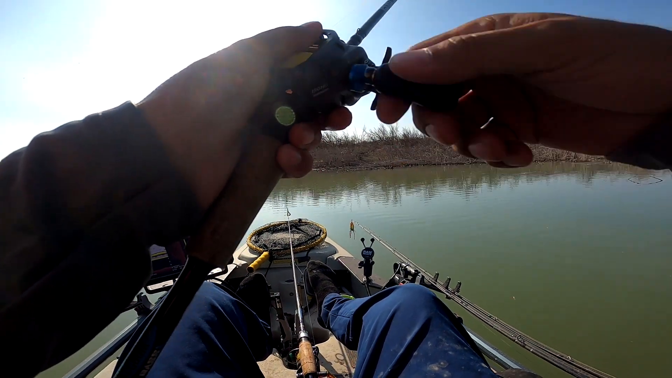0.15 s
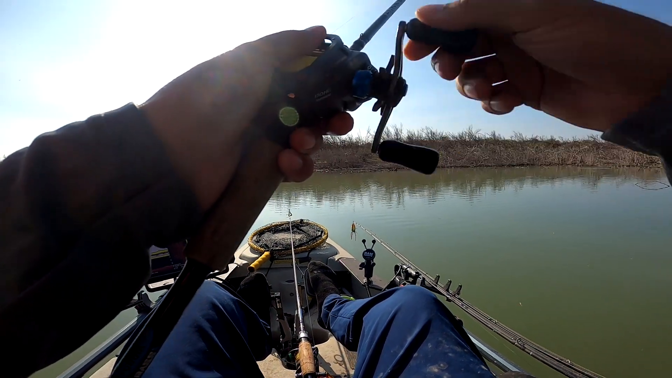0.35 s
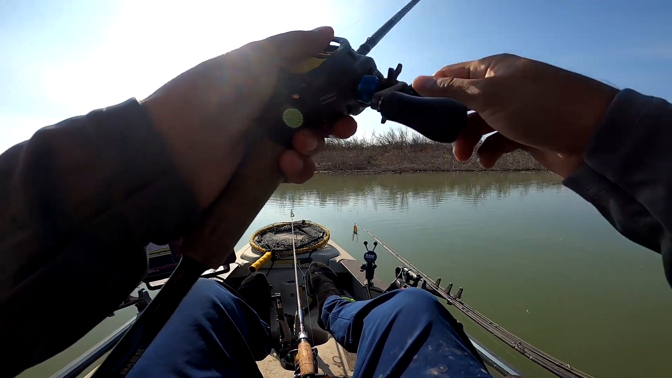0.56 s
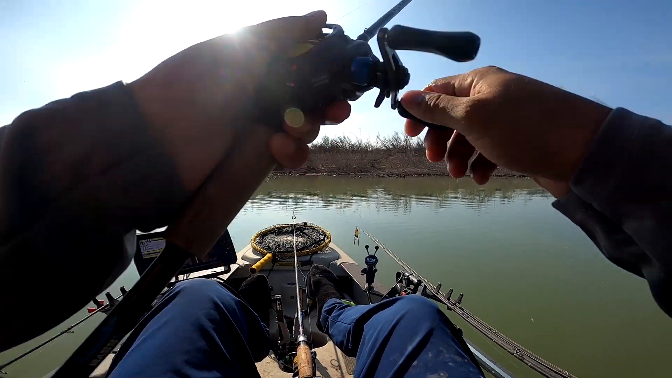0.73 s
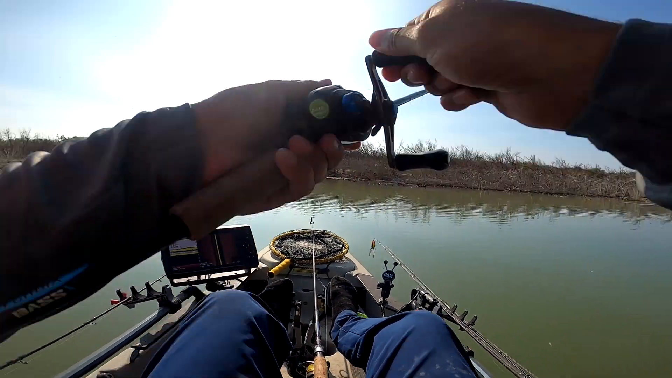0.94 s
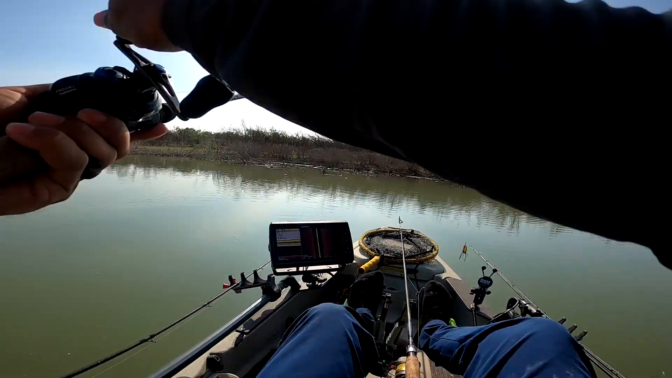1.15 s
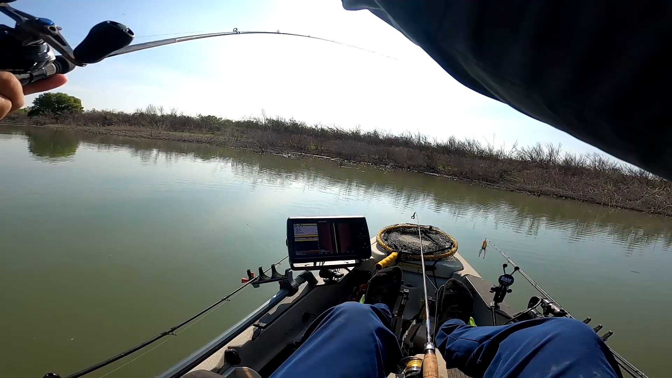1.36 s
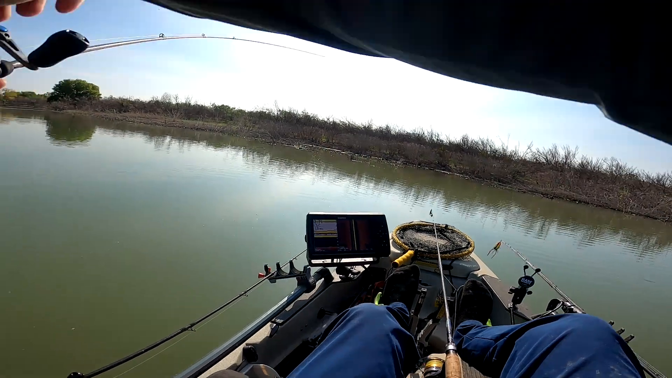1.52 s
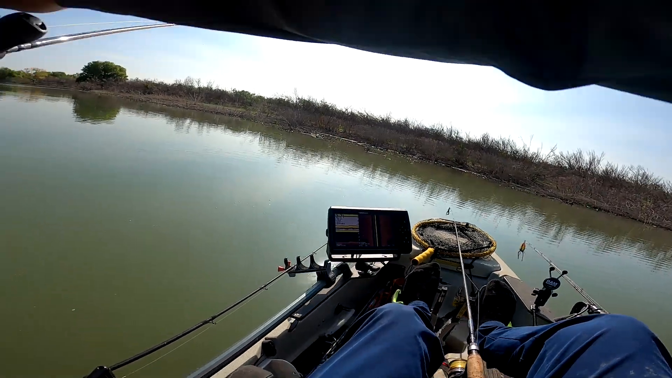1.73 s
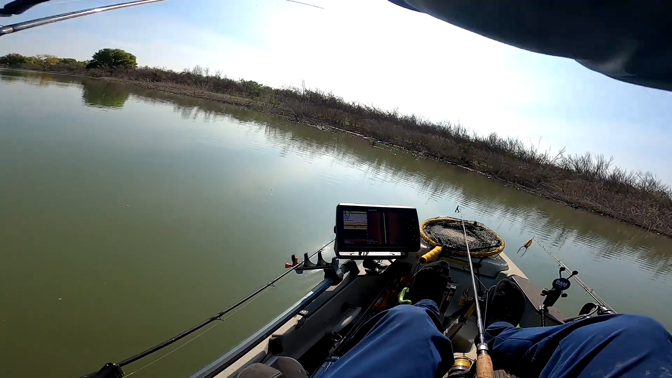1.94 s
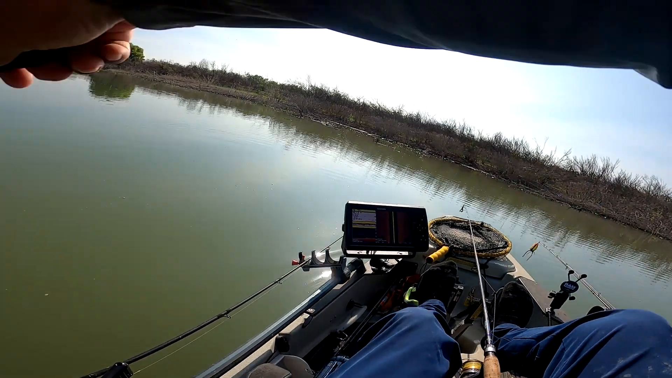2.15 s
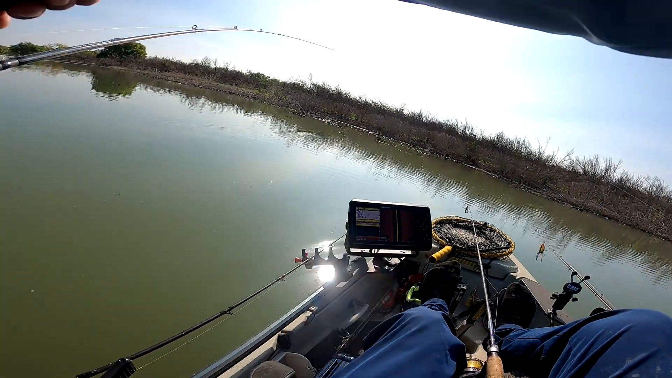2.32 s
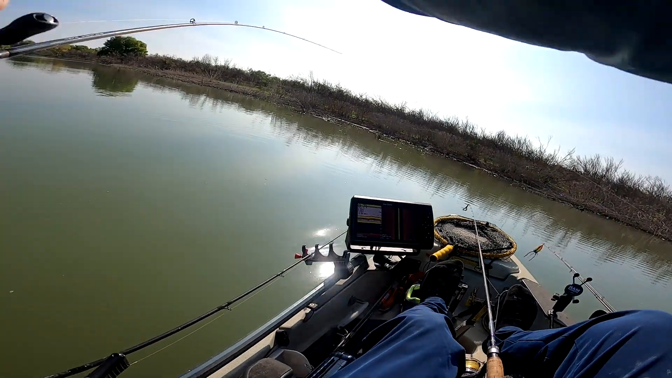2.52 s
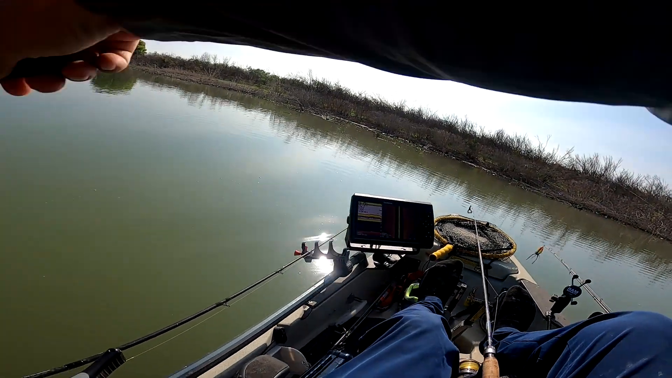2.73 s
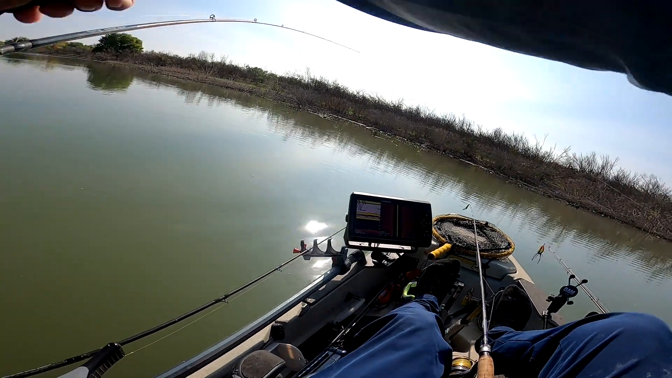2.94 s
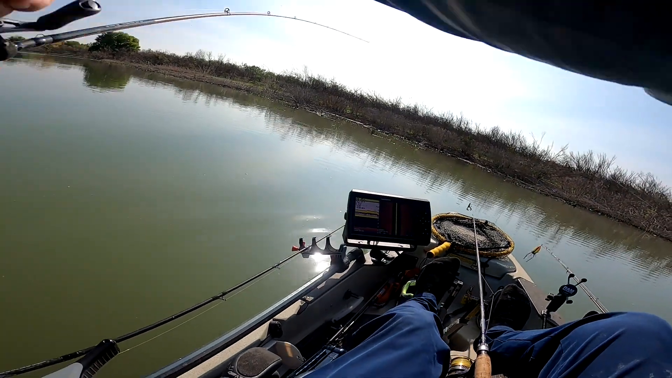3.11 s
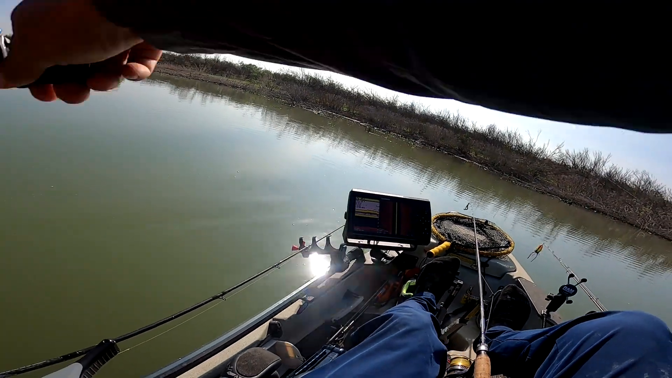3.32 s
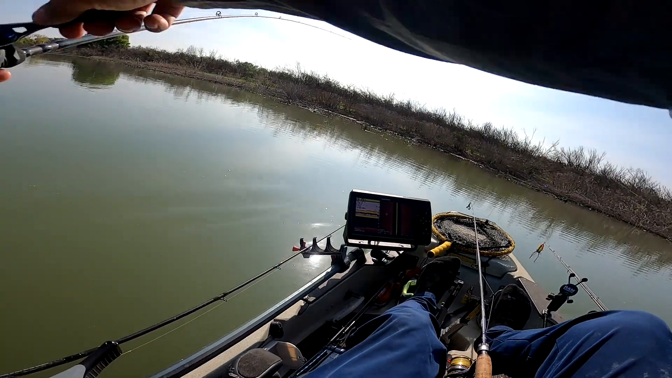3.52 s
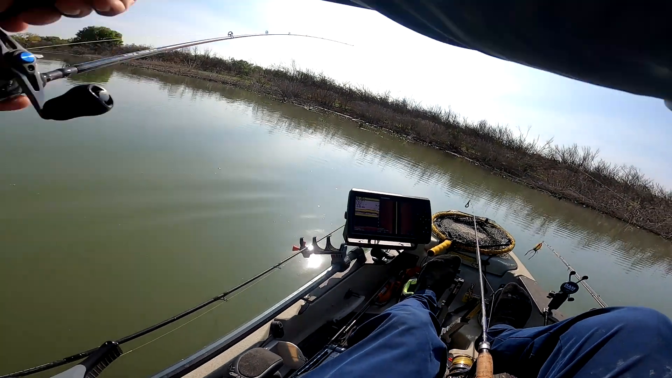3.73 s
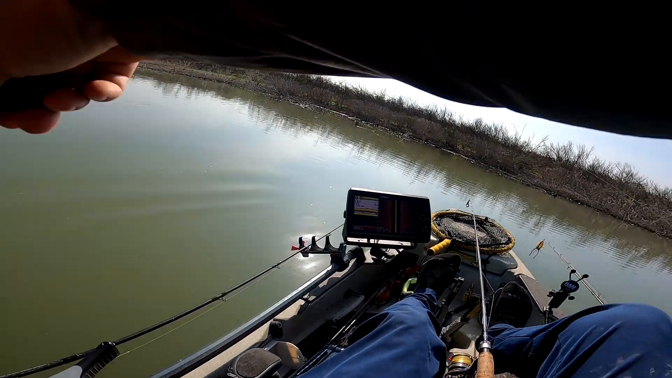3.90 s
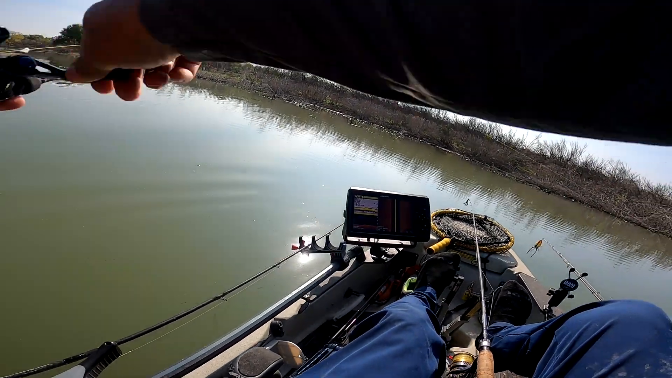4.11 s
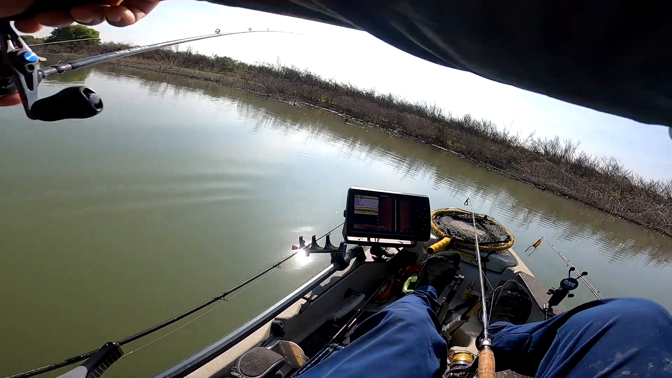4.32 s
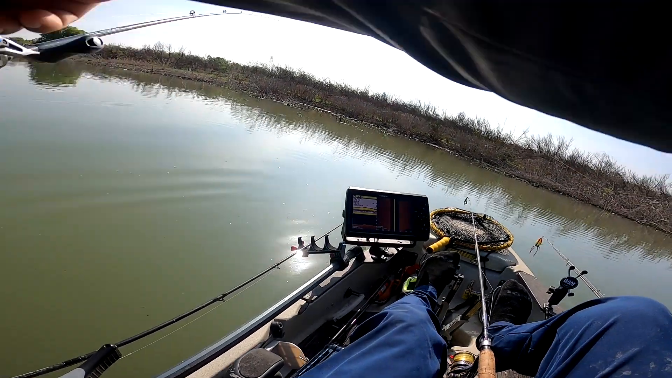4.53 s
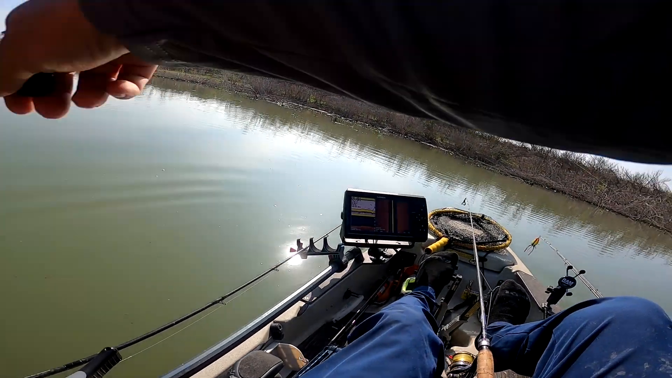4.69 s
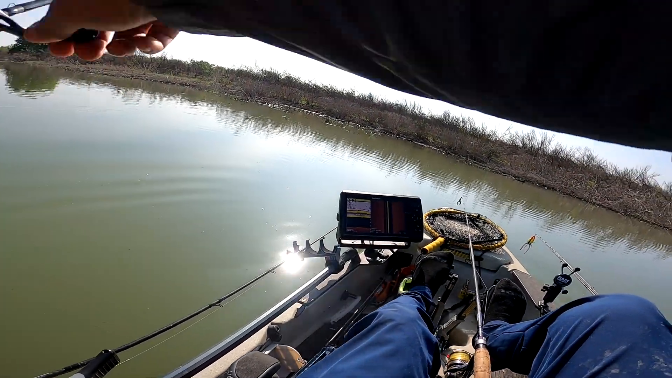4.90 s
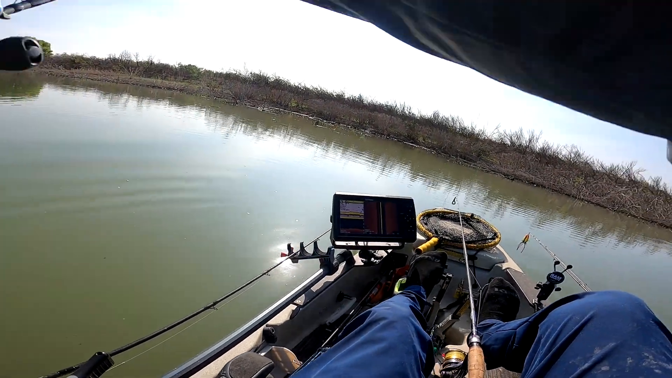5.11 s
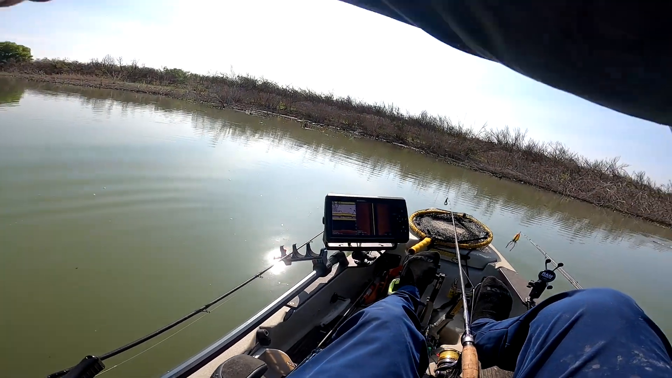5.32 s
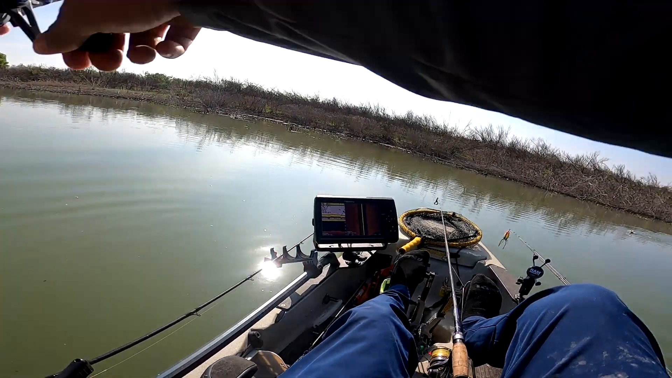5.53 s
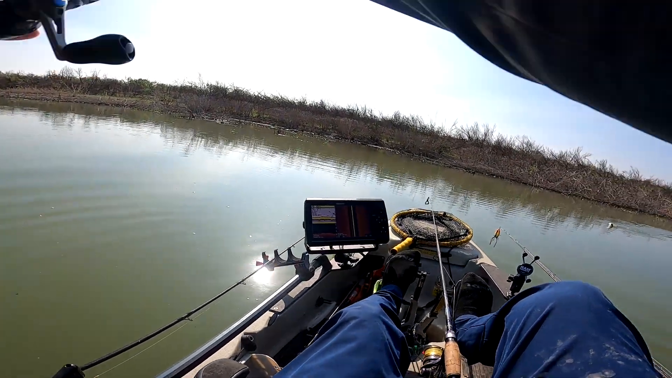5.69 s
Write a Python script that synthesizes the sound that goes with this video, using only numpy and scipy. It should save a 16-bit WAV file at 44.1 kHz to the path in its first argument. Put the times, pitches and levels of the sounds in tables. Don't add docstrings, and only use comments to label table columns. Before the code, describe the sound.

Close, dry outdoor sound from a chest-worn stereo microphone in a small boat. From 0 to 0.6 s a reel turns slowly: very quiet gritty whirr with a faint low airy hum and tiny line flicks. From about 0.7 s sleeves rustle and the strap rumbles, swelling to a rush near 1.1 s, with irregular plastic ticks crowding 1.0-1.3 s and more at 1.45-1.7 s. At 1.77 s the clutch snaps, very loud and sharp with a short thump; a click and ragged, breathy rod-tip whip follow at 1.9-2.0 s. From 1.8 s to the end fast cranking runs continuously, somewhat left: metallic bearing hiss and rough gear whine surging up and down about seven times a second, briefly sagging between pushes. Line scrapes thinly over guides, cloth rumbles softly, and dull knocks appear, clearest at 2.55 s. A tight click cluster comes at 5.6 s; cranking continues to the cutoff.

```python
import sys
import numpy as np
from scipy import signal
from scipy.fft import rfft, irfft, next_fast_len
from scipy.io import wavfile
from scipy.ndimage import uniform_filter1d

SR = 44100
rng = np.random.default_rng(int(sys.argv[2]) if len(sys.argv) > 2 else 0)


def wav_record(signal):
    frames = np.transpose(np.atleast_2d(signal))
    bounded = np.clip(frames, -1, 1)
    quanta = np.round(bounded * 32767).astype(np.int16)
    wavfile.write(sys.argv[1], SR, quanta)


N = 258137
T = np.arange(N) / SR
M = next_fast_len(N + SR // 10)
HZ = np.maximum(np.arange(M // 2 + 1) * SR / M, 1)

# [f/Hz, width/Hz, level/dB]
BODY_MODES = [(780, 35, -10.5), (1070, 72, -13), (1733, 320, -2.5), (1987, 85, -3), (2383, 143, -1.5),
              (2706, 56, 5), (3106, 370, -3.5), (3870, 92, -25), (4273, 580, 1.5), (5080, 890, -2),
              (5760, 340, -0.5), (6780, 160, -8), (7470, 95, -12), (8600, 50, -16)]
# [f/Hz, density/dB per Hz]
BODY_SKIRT = [(150, -34), (500, -39), (1200, -14.5), (1700, -10.5), (2150, -13), (3000, -12), (3750, -14),
              (4500, -9.5), (5900, -12), (7000, -21.5), (9000, -29.5), (12000, -39.5), (15500, -53)]
# [t/s, level/dB]
SLOW_WINDING = [(0.0, -61.5), (0.102, -61.5), (0.42, -62), (0.426, -57.5), (0.55, -58), (0.61, -60),
                (0.714, -65), (0.732, -55), (0.78, -62), (0.95, -47), (1.15, -69)]
# [f/Hz, width/Hz, level/dB]
SLOW_MODES = [(168, 39, 11.5), (2626, 220, 4.5), (2810, 40, 5.5), (3330, 98, -7), (5030, 260, -12),
              (7740, 120, -20)]
# [f/Hz, density/dB per Hz]
SLOW_SKIRT = [(15, -1), (60, -6), (170, -1), (450, -12.5), (1200, -13), (2500, -6.5), (4000, -17),
              (5800, -12), (7000, -23), (9000, -26.5), (15500, -56)]
# [f/Hz, density/dB per Hz]
RUMBLE_COLOUR = [(15, 6.5), (70, 0.5), (103, -4.5), (174, -1), (332, -10.5), (500, -19.5), (650, -24),
                 (1100, -120)]
# [f/Hz, density/dB per Hz]
RUB_COLOUR = [(120, -3), (250, 1.5), (400, -0.5), (800, -2), (1300, -8), (2200, -26), (5000, -52),
              (12000, -66)]
# [f/Hz, density/dB per Hz]
SLEEVE_COLOUR = [(410, -14), (700, -3.5), (1450, -1.5), (4350, -11), (5640, -17), (9980, -28.5),
                 (15500, -49)]
# [t/s, level/dB, vortex f/Hz]
WHIP = [
    (1.85, -61, 1396),
    (1.934, -20, 1420),
    (1.97, -24.5, 1400),
    (2.022, -33, 1250),
    (2.06, -34.5, 1553),
    (2.11, -41.5, 1420),
    (2.17, -44, 1400),
]
# [t/s, peak level/dB, ring f/Hz, bright crack/dB, treble/dB]
CAST_TICKS = [(0.635, -39, 1180, -27, -39), (0.642, -38, 1750, -25, -35), (0.687, -42, 1520, -25, -30),
              (0.728, -30, 1045, -29, -27), (0.768, -44, 859, -14, -2), (0.787, -40, 1500, -5, -20),
              (0.832, -40, 1500, -8, -20), (0.862, -40, 1500, -5, -20), (0.936, -28.5, 1150, -15, -14),
              (0.999, -32, 1150, -12, -25), (1.025, -29, 1800, -3, -20), (1.053, -18.5, 970, -7.5, -24),
              (1.065, -24, 1000, -20, -25), (1.088, -34, 1500, -6, -10), (1.112, -15, 1360, -0.5, -20),
              (1.115, -21.5, 1190, -2, -16), (1.129, -23.5, 780, -0.5, -6), (1.159, -18, 970, -16, -22),
              (1.185, -34, 1800, -14, -25), (1.198, -17, 2140, -13, -12), (1.208, -27, 910, -13, -22),
              (1.227, -44, 770, -19, 12), (1.281, -31.5, 1250, 2.5, -10), (1.429, -36, 910, -1, -1),
              (1.46, -18.5, 1035, -15, -32), (1.477, -24.5, 1730, -9, -28), (1.49, -32, 1070, 0.5, -30),
              (1.545, -33.5, 930, -9, -28), (1.612, -21.5, 950, -20, -41), (1.634, -30, 1170, -24, -36),
              (1.65, -36, 1040, -23, -18), (1.683, -31.5, 1100, 6.5, -14)]
# [t/s, peak level/dB, ring f/Hz, bright crack/dB, treble/dB]
REEL_TICKS = [
    (1.906, -17, 1430, -11, -22),
    (2.488, -37, 1730, 10, -12),
    (5.606, -23.5, 1090, -5, -33),
    (5.614, -26, 2230, -16, -23),
    (5.621, -17, 2255, -19, -24),
    (5.637, -22, 1020, -4, -12),
]
# [t/s, peak level/dB, ring f/Hz, t60/s]
KNOCKS = [(0.729, -37.5, 149.4, 0.12), (0.841, -32, 130, 0.045), (1.457, -38, 164, 0.052),
          (1.471, -43, 131, 0.071), (1.606, -25.5, 168, 0.041), (2.545, -21.5, 276.6, 0.13),
          (2.619, -35.5, 294, 0.16), (2.823, -31.5, 395, 0.035), (3.073, -35, 610.5, 0.034),
          (3.211, -37, 174.2, 0.061), (3.469, -41, 463, 0.1), (3.587, -42.5, 303, 0.16),
          (3.669, -38.5, 394.3, 0.2), (3.946, -37, 403.7, 0.094), (4.291, -36.5, 378, 0.052),
          (4.837, -55, 170, 0.073), (4.975, -43, 899, .03), (5.0, -40, 801, .03),
          (5.091, -39.5, 643.3, 0.075), (5.601, -33, 330.2, 0.059), (5.634, -29, 681, 0.027)]
# [f/Hz, level/dB, t60/s]
SNAP_RINGS = [(105, -22, .12), (175, -11, .045), (330, -24, .03), (600, -26, .008), (1150, -9, .005),
              (1900, -8, .003), (2950, 9.5, .0013), (5600, -13, .0025), (9000, -15, .002),
              (11800, -19, .0025)]
# [f/Hz, left minus right/dB]
REEL_PAN = [(60, -1), (200, -3), (700, 17), (1290, 0.5), (2380, 10), (4400, 6.5), (8120, 3), (15000, 0)]
# [f/Hz, left minus right/dB]
AHEAD_PAN = [(60, 1.5), (700, -0.5), (1290, 1), (2380, 1), (8120, 3), (15000, -9)]
# [f/Hz, left minus right/dB]
SWING_PAN = [(60, 2.5), (200, 2.5), (700, 1), (2380, 5.5), (8120, 3.5), (15000, -4)]
# [t/s, top tooth rate f/Hz, rise/s, fall/s, force level/dB]
PUSHES = [(1.92, 2904, .04, 0.045, 14.5), (2.049, 2505, .02, 0.023, 6), (2.205, 2263, 0.061, 0.059, -1.5),
          (2.331, 2618, .025, 0.035, 5.5), (2.53, 2963, 0.044, 0.041, 11.5),
          (2.815, 2456, 0.016, 0.049, 9.5), (3.105, 2461, 0.019, 0.054, 9), (3.401, 2205, .03, 0.056, 2),
          (3.51, 2382, .025, 0.039, 4), (3.66, 2408, .05, 0.077, 7), (3.966, 2577, 0.044, 0.042, 2.5),
          (4.235, 2476, 0.026, 0.042, 6), (4.54, 2407, .05, 0.041, 0), (4.765, 2648, .025, 0.062, -1),
          (5.065, 2416, 0.052, 0.024, 6), (5.24, 2404, .025, .03, 5.5), (5.552, 2208, 0.032, 0.05, 3),
          (5.645, 2366, 0.065, 0.055, 4.5), (5.86, 2435, 0.047, 0.047, 10.5)]
# [t/s, top tooth rate f/Hz, length/s, force level/dB]
PULLS = [(1.83, 1790, 0.05, -6), (2.402, 1763, 0.067, 6), (2.648, 1785, 0.019, 2.5), (2.74, 1792, .02, 4),
         (2.94, 1860, 0.031, 5.5), (2.999, 1780, 0.04, 3.5), (3.29, 1665, 0.039, -3),
         (3.82, 1787, 0.089, 4), (4.057, 2002, .017, -2), (4.17, 1796, 0.032, 5),
         (4.397, 1736, 0.061, -0.5), (4.455, 1900, 0.033, 0.5), (4.65, 1727, 0.043, -2),
         (4.926, 1785, 0.036, -3), (5.331, 1822, 0.027, 3), (5.385, 1987, 0.018, 0.5),
         (5.504, 1776, 0.049, 0.5), (5.721, 1590, 0.038, 1)]
# [t/s, depth/dB, slowing/s, share of speed lost]
STALLS = [(1.992, 8, .02, .15), (2.109, 5.5, .02, 0.16), (2.475, 9, 0.079, .24), (2.598, 10.5, .019, .2),
          (2.902, 1, .03, .04), (3.351, 1, .019, 0.079), (3.475, 2.5, .02, .06), (3.91, 0, .015, .14),
          (4.02, 2, .015, .12), (4.279, 2, .024, .09), (4.631, 3, .031, 0.059), (4.722, 0.5, .015, .25),
          (4.866, 2.5, 0.022, .05), (4.978, -2, .015, 0.17), (5.135, 2, .03, 0.082), (5.279, 6, .02, .2),
          (5.422, 3.5, .022, .27)]
# [t/s, bearing hiss level/dB, tooth whine minus hiss/dB, upper tooth lines/dB (taut line)]
EFFORT = [(1.8, -39, 1, -1.5), (1.88, -36.5, -11, 0.5), (2.07, -38.5, -4, -4.5), (2.2, -36, 2.5, 2),
          (2.35, -36, -4.5, -6.5), (2.55, -34, -9, -0.5), (2.7, -36, -5, -0.5), (2.85, -37.5, -7, 6.5),
          (3.1, -37, -7.5, 6), (3.4, -36, -1, 2), (3.67, -38, -4, 1.5), (3.8, -36.5, -4.5, -2),
          (3.96, -36, 0, -0.5), (4.05, -36, -2, 0), (4.23, -37, 0, -2.5), (4.55, -37.5, -2.5, -1),
          (4.8, -38.5, -0.5, -2), (5.1, -38.5, 0.5, -6), (5.3, -36.5, -2.5, 0), (5.5, -37.5, 1.5, -0.5),
          (5.85, -39, 0.5, -4.5)]
# [level/dB, steady share, smear/Hz]
TEETH = [(-9, .7, 150), (0, .55, 420), (-9, .3, 500), (-2, .7, 650), (-12, .3, 700), (-4.5, .6, 550)]
# [t/s, factor on steady share of mesh line, of upper lines]
MESH = [(1.8, 1, 1), (2.05, 2.2, 1.5), (2.15, 2.2, 2.4), (2.3, 2, 2.2), (2.5, 1.2, 1), (2.8, 1.3, 1.4),
        (2.92, 1.5, .7), (3.0, 2.4, .8), (3.1, 1.1, .6), (3.4, 1.1, 1.9), (3.5, 1, 1.2), (3.9, .8, 1),
        (4.0, 1.2, 1.2), (4.3, .8, .9), (4.95, .8, .6), (5.1, 1.2, .5), (5.3, 1.9, .6), (5.5, 2.3, .8),
        (5.62, 1.3, .6), (5.85, 1.6, .6)]
# [t/s, level/dB, length/s]
SINGS = [(1.973, -38, 0.041), (2.196, -24.5, 0.021), (2.332, -28.5, 0.015), (2.555, -30.5, 0.0097),
         (2.811, -33.5, 0.0092), (3.131, -36.5, .025), (3.658, -39, .015), (4.043, -33, .012),
         (4.226, -33.5, 0.0097), (4.308, -45, 0.014), (4.467, -37, 0.027), (4.79, -39.5, 0.059),
         (4.92, -39, 0.033), (5.071, -33.5, .015), (5.132, -41, 0.032), (5.245, -32, .012),
         (5.757, -37, .02)]
# [t/s, peak level/dB]
SLIPS = [(1.9294, -39), (2.029, -32), (2.181, -41), (2.327, -49), (2.5076, -48), (2.8394, -50),
         (2.9374, -54), (3.092, -47), (3.6776, -39), (3.9496, -39), (4.3347, -54), (4.823, -43),
         (5.07, -38.5), (5.3213, -38), (5.4001, -47), (5.5528, -44), (5.636, -36), (5.8183, -38)]
# [t/s, peak level/dB]
FLICKS = [(0.0328, -63), (0.0677, -62), (0.1421, -55), (0.2494, -67), (0.2887, -62), (0.3057, -62),
          (0.3227, -58), (0.9308, -36.5), (0.9867, -45), (1.8582, -52), (1.8806, -49), (2.1999, -46),
          (3.1348, -41), (4.9234, -47), (5.7299, -49)]
# [t/s, sleeve slide level/dB, strap tug level/dB]
SWING = [
    (0.68, -78, -71),
    (0.74, -56.5, -46),
    (0.87, -48.5, -42),
    (0.96, -45, -35),
    (1.09, -34.5, -22),
    (1.19, -42.5, -25),
    (1.25, -47.5, -33.5),
    (1.47, -50.5, -32.5),
    (1.52, -49, -37.5),
    (1.76, -49, -42),
]
# [t/s, rumble level/dB, length/s, rub minus rumble/dB]
ROCKS = [(1.79, -38.5, 0.038, -14), (1.923, -37.5, 0.046, 8), (2.022, -42, 0.05, 3),
         (2.264, -47, 0.26, 0.5), (2.62, -44, 0.072, -24), (2.86, -49, 0.14, -4), (3.206, -46, 0.029, -21),
         (3.465, -51.5, 0.11, 1), (3.698, -49, .04, 1), (3.972, -59, 0.079, 7.5), (4.86, -49.5, 0.027, -8),
         (5.1, -53, 0.058, 3), (5.346, -59, 0.049, 0), (5.653, -53.5, 0.18, 5)]


def undb(db):
    return np.exp(np.asarray(db) * (np.log(10) / 20))


def unit(x):
    return x / np.sqrt(np.mean(x ** 2))


def track(table, rest=None):
    s, *columns = np.transpose(table)
    return [np.interp(T, s, c, rest, rest) for c in columns]


def over_hz(points):
    hz, value = np.transpose(points)
    return np.interp(np.log(HZ), np.log(hz), value)


def colour(x, points, peaks=(), peak_db=0.):
    power = undb(2 * over_hz(points))
    for hz, width, db in peaks:
        detune = (HZ / hz - hz / HZ) * hz / width
        power = power + undb(2 * (db + peak_db)) / (1 + detune ** 2) ** 2
    return unit(irfft(rfft(x, M) * np.sqrt(power), M)[:N])


def walk(rate):
    k = int(SR / rate)
    steps = np.repeat(rng.standard_normal(N // k + 1), k)
    return 1.304 * uniform_filter1d(uniform_filter1d(steps, k), k)[:N]


def grit(rate, spread_db, smooth):
    size_db = spread_db * np.minimum(rng.exponential(size=N), 3)
    grains = (rng.random(N) < rate / SR) * rng.standard_normal(N) * undb(size_db)
    return unit(grains) + smooth * rng.standard_normal(N)


def hump(s, rise, fall):
    out = np.zeros(N)
    near = slice(max(int((s - 4 * rise) * SR), 0), int((s + 4 * fall) * SR))
    out[near] = np.exp(-((T[near] - s) / np.where(T[near] < s, rise, fall)) ** 2)
    return out


def add_ring(out, s, hz, db, t60, pan_db=0., rise=0.000071):
    i = int(s * SR)
    t = np.arange(min(int(t60 * SR), N - i)) / SR
    ring = undb(db - 60 * t / t60) * (1 - np.exp(-t / rise)) * np.sin(2 * np.pi * hz * t)
    out[:, i:i + len(t)] += ring * undb(np.array([[pan_db], [-pan_db]]) / 2)


def ports(x, pan, lag, bounce_db, tilt=0.043):
    out = []
    for side in (1, -1):
        late = np.pad(x, (60 + 15 * side, 0))[:N]
        bounce = rfft(late * walk(rate=350), M) * undb(bounce_db) * (HZ / 3000) ** tilt
        direct = rfft(np.pad(x, (0, M - N), "linear_ramp"))
        direct = direct * np.exp(1j * side * np.pi * HZ * lag / SR)
        out.append(irfft(undb(side * over_hz(pan) / 2) * (direct + bounce), M)[:N])
    return np.array(out)


def cloth():
    slide_db, tug_db = track(SWING, -120.)
    rub_db = -27.5 + (slide_db + 34.5) + 0.29 * (tug_db + 24)
    cranking = T > SWING[-1][0]
    tug = undb(tug_db) + cranking * undb(-54.5)
    press = undb(rub_db) + cranking * undb(-56)
    for s, db, length, rub_rel_db in ROCKS:
        rock = undb(db) * hump(s, length, length)
        tug = tug + rock
        press = press + rock * undb(rub_rel_db)
    rumble = tug * undb(2.2 * walk(25) + 2.2 * walk(9)) * colour(rng.standard_normal(N), RUMBLE_COLOUR)
    jolts = np.zeros(N)
    for s, db, hz, t60 in KNOCKS:
        jolts += (T > s) * undb(db - 9.0 - 60 * np.maximum(T - s, 0) / (1.83 * t60))
    rub = (press * undb(-1.5 + 2.8 * walk(45)) + jolts) * colour(grit(900, 2.7, 0.96), RUB_COLOUR)
    fibres = colour(grit(2500, 2.5, 1.4), SLEEVE_COLOUR)
    bright = undb(0.11 * (slide_db + 29)) * np.gradient(fibres) * 0.95
    sleeve = undb(slide_db + 1.0 + 1.3 * walk(30)) * (fibres + bright)
    through_case = ports(rumble + rub, SWING_PAN, lag=.3, bounce_db=-3.0, tilt=0.27)
    return through_case + ports(sleeve, SWING_PAN, lag=0.92, bounce_db=2.0)


def slow_reel():
    whirr = undb(1.5 * walk(25)) * grit(3000, 3, 1)
    whirr = colour(whirr, SLOW_SKIRT, SLOW_MODES, peak_db=-1.5)
    hum = colour(rng.standard_normal(N), [(100, -60), (15500, -60)], [(737, 140, 0)])
    hum_fade_db = -4.2 * np.clip((T - 0.5) / .08, 0, 1)
    whirr = whirr + undb(-9.0 + 2.1 * walk(13.5) + hum_fade_db) * hum
    return ports(undb(track(SLOW_WINDING)[0] + 8) * whirr, AHEAD_PAN, lag=-0.91, bounce_db=-5.5)


def ticks():
    out, crack = np.zeros((2, N)), np.zeros(N)
    events = [(*row, 6.5) for row in CAST_TICKS] + [(*row, 13) for row in REEL_TICKS]
    chance = rng.random((len(events), 4))
    for (s, db, hz, bright_db, treble_db, pan_db), (a, b, c, d) in zip(events, chance):
        add_ring(out, s, hz, db, 22 / hz, pan_db)
        crack += (T > s) * undb(db + bright_db - 3.0 - 60 * np.maximum(T - s, 0) / 0.015)
        add_ring(out, s, 2550 + 700 * a, db + bright_db + 4, .0045, pan_db)
        add_ring(out, s, 4300 + 1500 * b, db + bright_db - 1, .004, pan_db)
        add_ring(out, s, 6200 + 2200 * c, db + treble_db + 0.5, .006, .6 * pan_db)
        add_ring(out, s, 9000 + 4000 * d, db + treble_db - 7, .004, -.3 * pan_db)
    splinter_colour = [(800, -8), (2500, 2), (6000, -7), (9000, -24), (15500, -50)]
    splinters = colour(rng.standard_normal(N), splinter_colour)
    return out + ports(crack * splinters, SWING_PAN, lag=1.0, bounce_db=-7.0)


def knocks():
    out = np.zeros((2, N))
    for s, db, hz, t60 in KNOCKS:
        add_ring(out, s, hz, db + 6.0, t60, 1.5, rise=0.0054)
        add_ring(out, s, 1.21 * hz, db + 1.5, 0.4 * t60, 1.5, rise=0.0004)
        add_ring(out, s, 2.1 * hz, db - 12, 2.15 * t60, 1.5, rise=0.001)
    return out


def clutch_snap():
    out = np.zeros((2, N))
    for hz, db, t60 in SNAP_RINGS:
        late = .0014 * (hz < 500)
        swing = -1 if 1000 < hz < 2000 else 1
        add_ring(out, 1.7688 + late, swing * hz, db, t60, 12 * min(hz / 1500, 1), rise=.0003)
    return out


def whip():
    level_db, hz = track(WHIP)
    level_db = level_db - 300 * np.maximum(T - WHIP[-1][0], 0)
    level_db = np.where(T > WHIP[0][0], level_db, -90)
    ragged = unit(uniform_filter1d(rng.standard_normal(N), size=60))
    shed = ragged * np.sin(np.cumsum(hz) * 2 * np.pi / SR)
    air_colour = [(200, -26), (600, -3.0), (1300, 11.5), (2500, 1), (3300, -19), (6000, -34),
                  (9000, -65), (15500, -80)]
    air = colour(grit(2500, 2.5, 1.0), air_colour)
    burst = undb(level_db + 0.62 * walk(72)) * (undb(-13.0) * shed + undb(-0.5) * air)
    return ports(burst, REEL_PAN, lag=1.0, bounce_db=-6.0)


def line_on_guides(hiss_db):
    slip_s, flick_s = 0.012, 0.0028
    level = undb(hiss_db - 25 + 5.9 * walk(14))
    for s, db in SLIPS:
        level = level + undb(db - 14.0) * hump(s + slip_s, 1.55 * slip_s, .7 * slip_s)
    for s, db in FLICKS:
        level = level + undb(db - 4.5) * hump(s + flick_s, flick_s, flick_s)
    scrape_colour = [(3000, -26), (6000, -1.5), (7500, -4), (10000, -15.0), (15500, -23.5)]
    scrape = colour(grit(1500, 3.1, 0.98), scrape_colour)
    return ports(level * scrape, SWING_PAN, lag=1.52, bounce_db=-1.5)


def handle():
    coast_hz = 1507
    strokes = PUSHES + [(s, hz, length, length, db) for s, hz, length, db in PULLS]
    humps = np.array([hump(s, rise, fall) for s, hz, rise, fall, db in strokes])
    strokes = np.array(strokes)
    top_hz, force_db = strokes[:, 1, None], strokes[:, 4, None]
    stall_db, lost = sum(np.outer((db, share), hump(s, slowing, .018)) for s, db, slowing, share in STALLS)
    hz = coast_hz * (1 - lost) + np.max((top_hz - coast_hz) * humps, axis=0)
    force_db = np.sum(force_db * humps ** 1.4, axis=0)
    hiss_db, load_db, upper_db = track(EFFORT)
    disengaged = np.clip(1 - (T - 1.789) / 0.021, 0, 1)
    hiss_db = hiss_db - stall_db - 50 * disengaged ** 2
    whine_db = hiss_db + load_db + force_db + .45 * stall_db
    return hz, hiss_db + 0.3 * force_db, whine_db, upper_db


def tooth_whine(hz, whine_db, upper_db):
    turns = np.cumsum(hz * (1 + .015 * walk(110))) * np.pi / SR
    mesh, upper_mesh = track(MESH)
    speed = np.log2(hz / 1900)
    teeth = np.zeros(N)
    for k, (db, steady, smear) in enumerate(TEETH, 1):
        level = undb(db + 1.2 * walk(35) + (k > 2) * upper_db)
        clean = steady * (mesh if k <= 2 else upper_mesh)
        teeth += level * (clean + walk(smear)) * np.sin(k * turns)
    teeth += undb(-3.5 + 15.2 * speed) * walk(1100) * np.sin(2.1 * turns)
    return undb(whine_db + 0.25) * colour(teeth, BODY_SKIRT, BODY_MODES, peak_db=-4.5)


def bearing_hiss(hiss_db):
    frame = colour(grit(4000, 2.4, 0.89), BODY_SKIRT, BODY_MODES[:4], peak_db=6.0)
    plate = colour(grit(4000, 6.3, 0.67), BODY_SKIRT, BODY_MODES[4:7], peak_db=7.5)
    spool = colour(grit(4000, 0.73, 0.99), BODY_SKIRT, BODY_MODES[7:9], peak_db=-2.5)
    cap = colour(rng.standard_normal(N), BODY_SKIRT, BODY_MODES[9:], peak_db=1.0)
    hiss = undb(-7.5 + 3.6 * walk(22)) * frame
    hiss += undb(-6.0 + 2.2 * walk(25.04)) * plate
    hiss += undb(-2.5 + 2.2 * walk(30)) * spool
    hiss += undb(-5.5 + 2.2 * walk(20)) * cap
    return undb(hiss_db - 2.5) * hiss


def plate_sing():
    level = sum(undb(db) * hump(s, length, length) for s, db, length in SINGS)
    return level * (0.47 + walk(260)) * np.sin(2 * np.pi * 2660 * T)


def fast_reel():
    hz, hiss_db, whine_db, upper_db = handle()
    reel = tooth_whine(hz, whine_db, upper_db) + bearing_hiss(hiss_db) + plate_sing()
    return ports(reel, REEL_PAN, lag=1.34, bounce_db=-9.0) + line_on_guides(hiss_db)


def scene():
    return cloth() + slow_reel() + ticks() + knocks() + clutch_snap() + whip() + fast_reel()


def top_cut(x):
    return signal.sosfilt(signal.butter(12, 15850, fs=SR, output="sos"), x)


def record(dry):
    low_pass = signal.ellip(8, .2, 60, 15800, fs=SR, output="sos")
    mix = np.clip(signal.sosfilt(low_pass, dry), -1, 1)
    return top_cut(mix)


dry = scene()
out = record(dry)
wav_record(out)
```